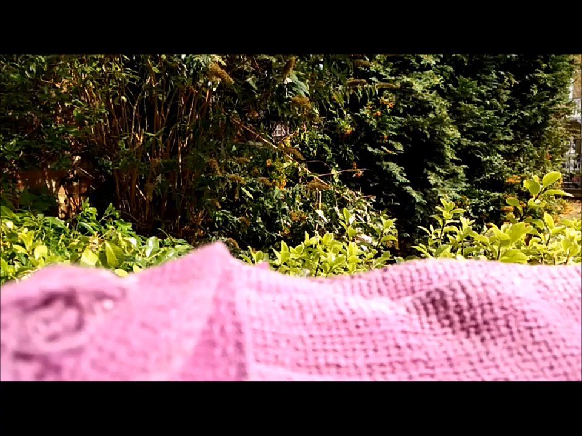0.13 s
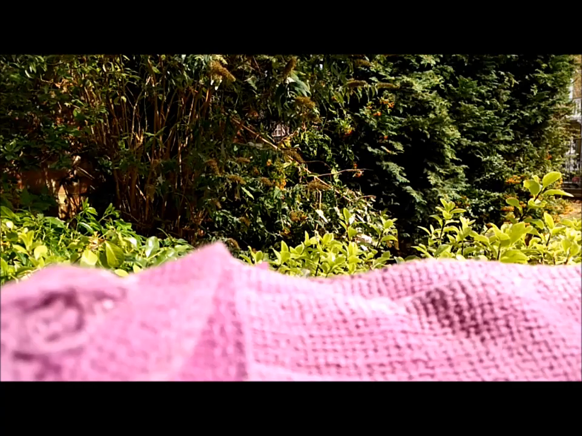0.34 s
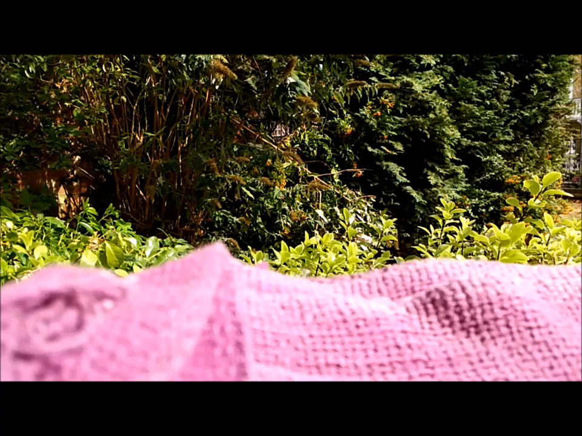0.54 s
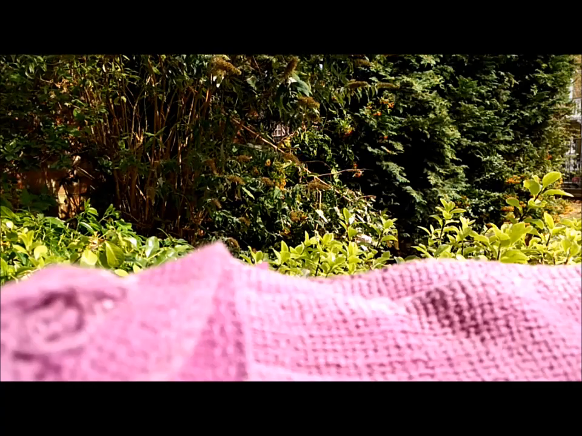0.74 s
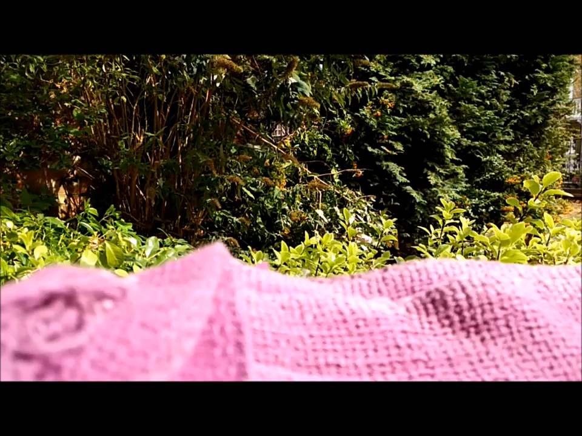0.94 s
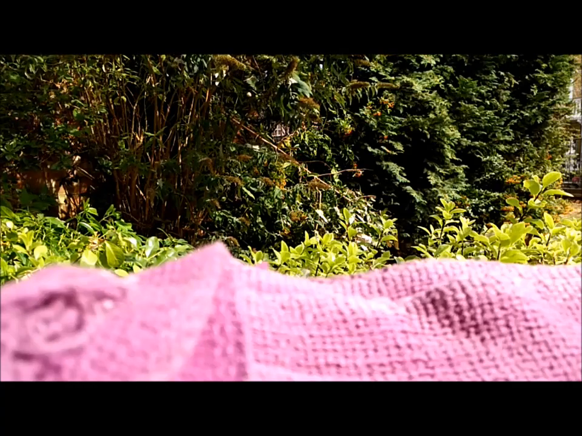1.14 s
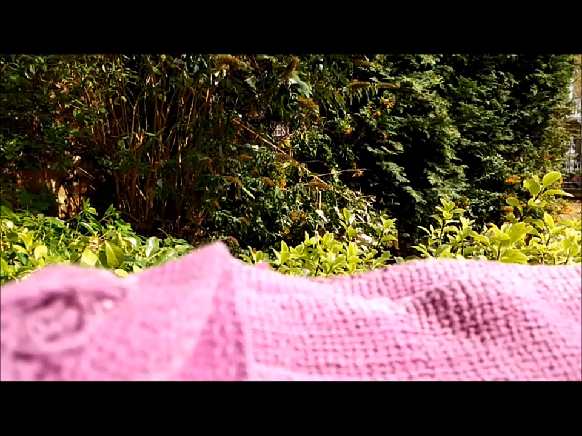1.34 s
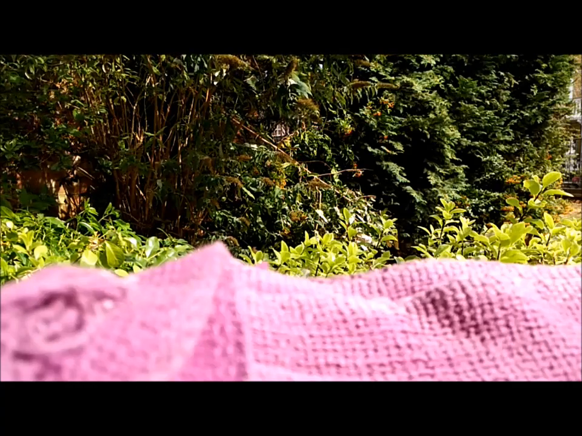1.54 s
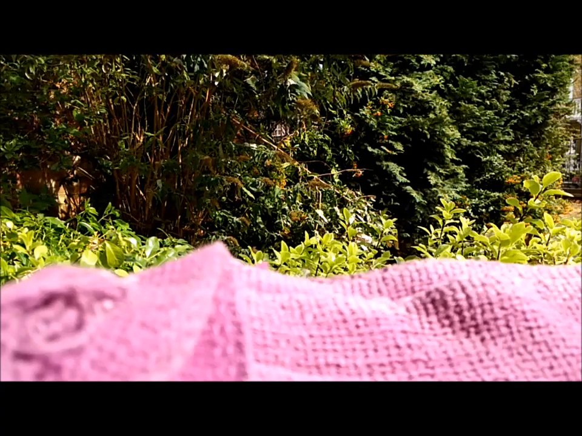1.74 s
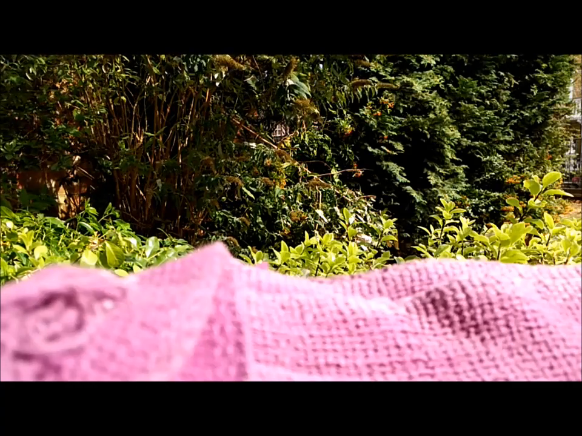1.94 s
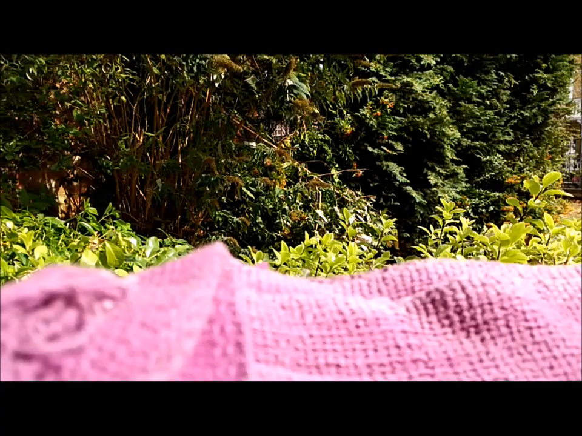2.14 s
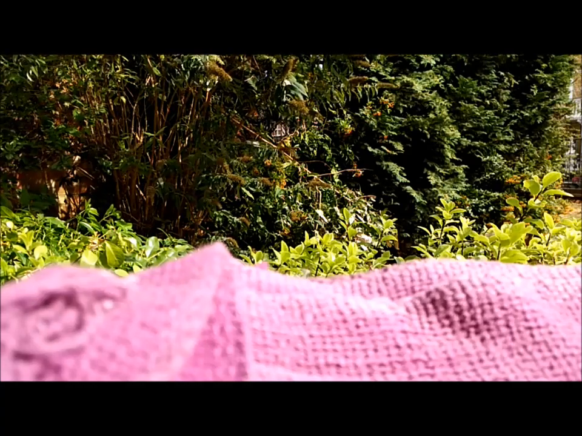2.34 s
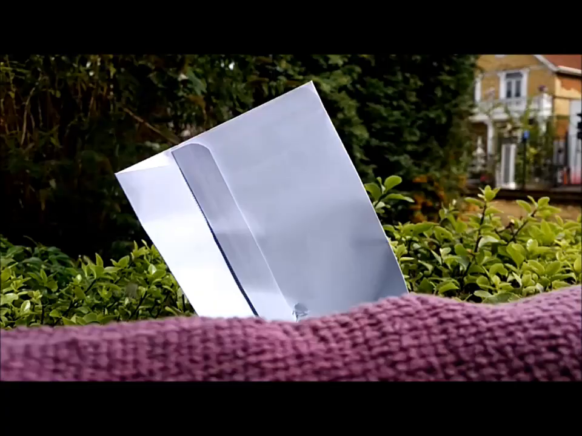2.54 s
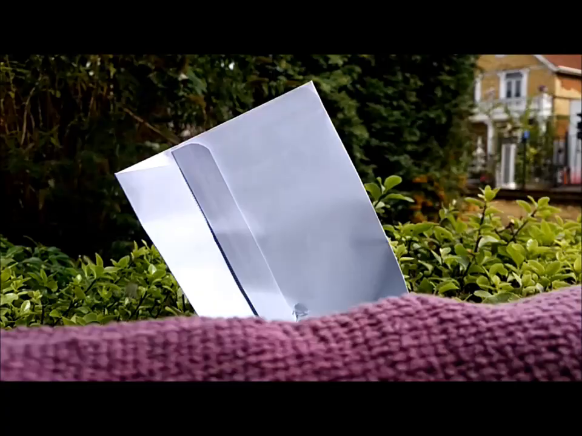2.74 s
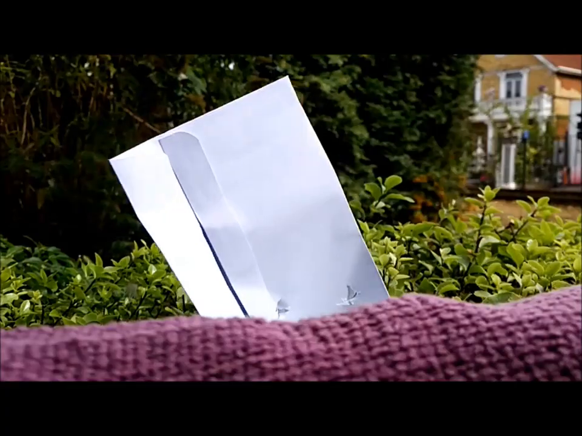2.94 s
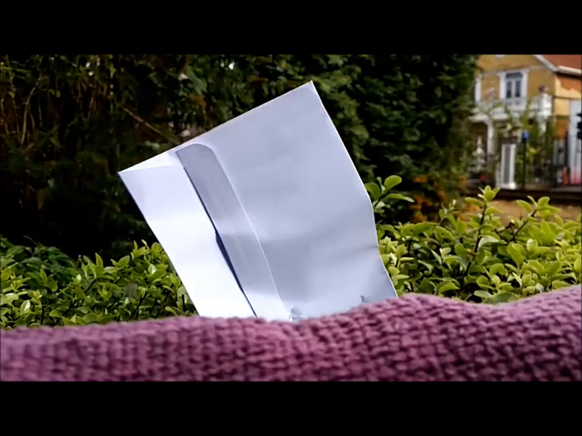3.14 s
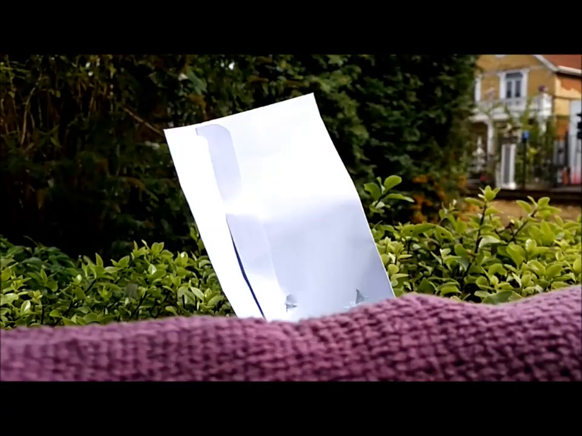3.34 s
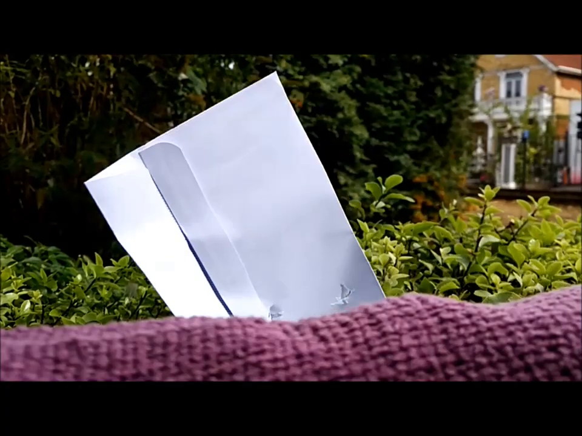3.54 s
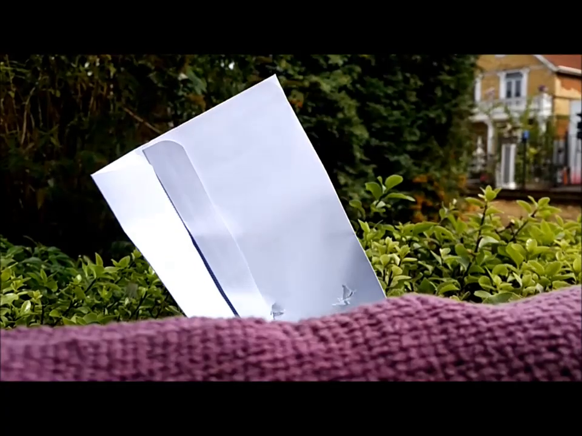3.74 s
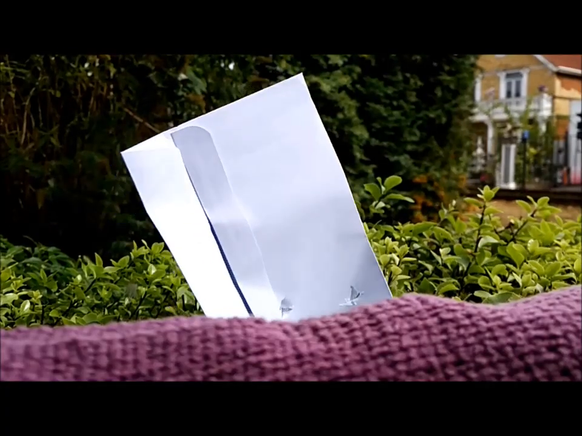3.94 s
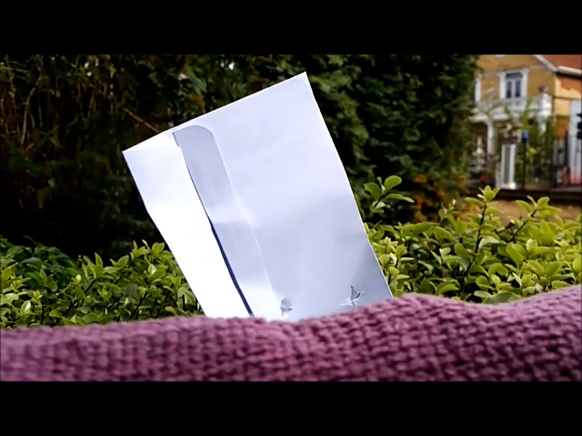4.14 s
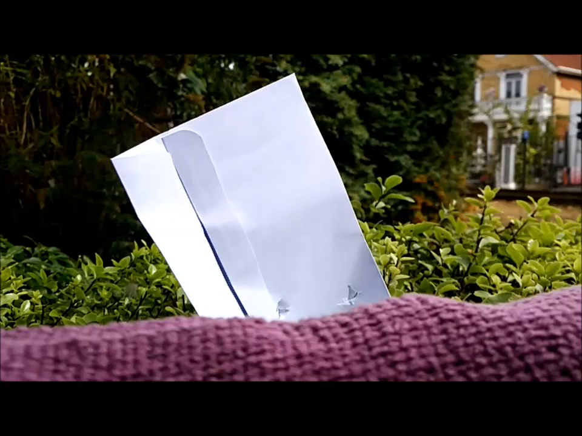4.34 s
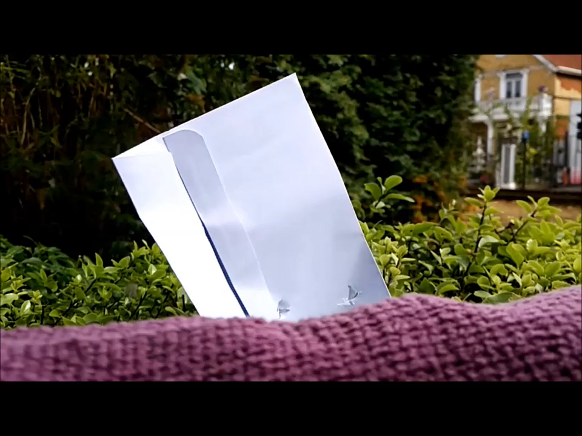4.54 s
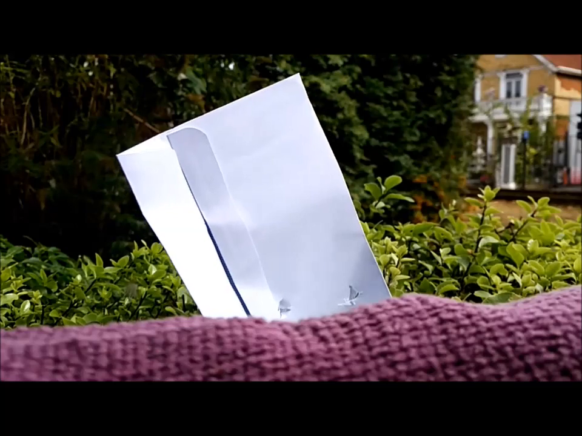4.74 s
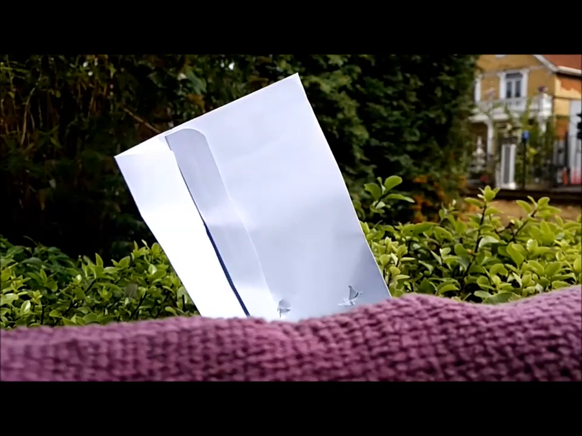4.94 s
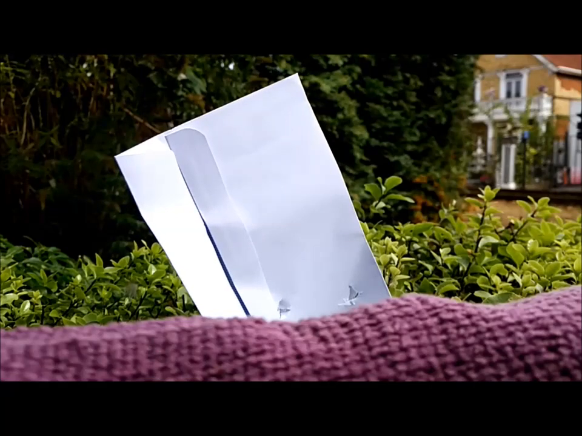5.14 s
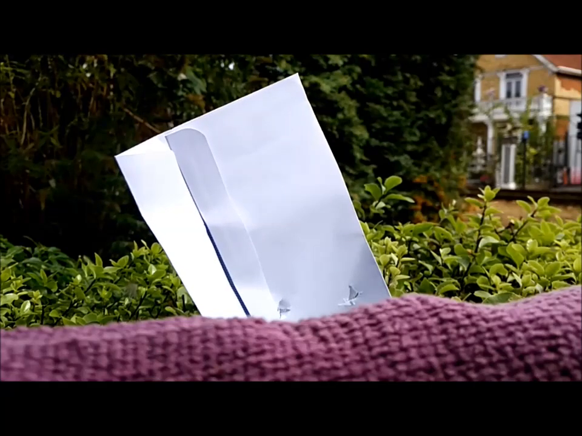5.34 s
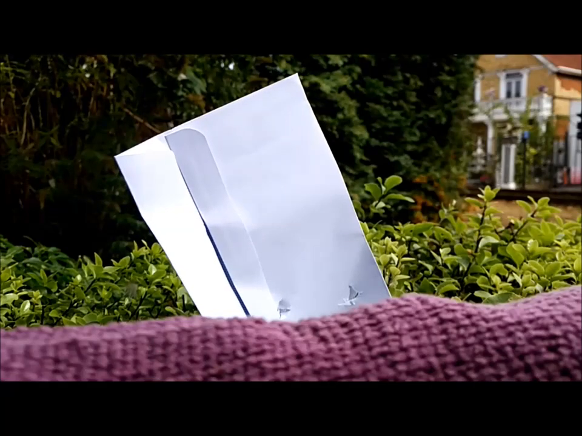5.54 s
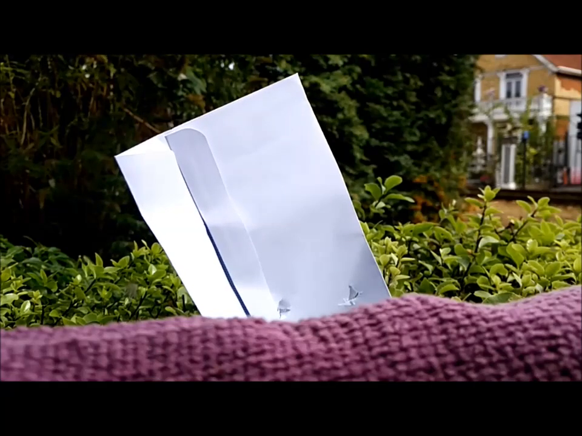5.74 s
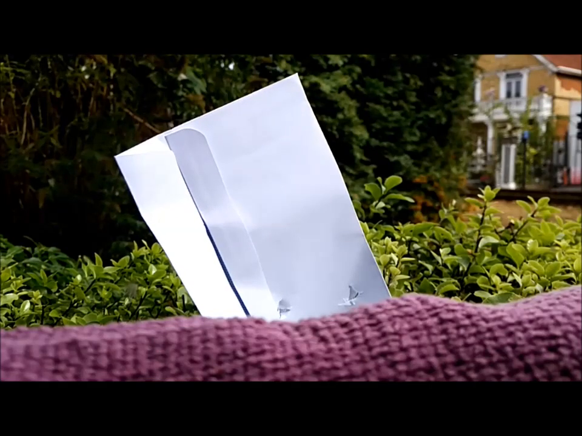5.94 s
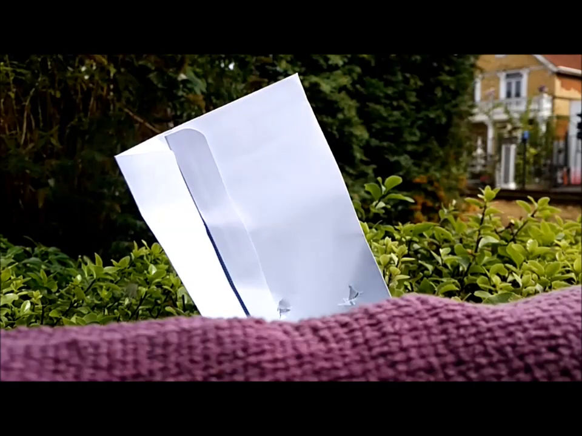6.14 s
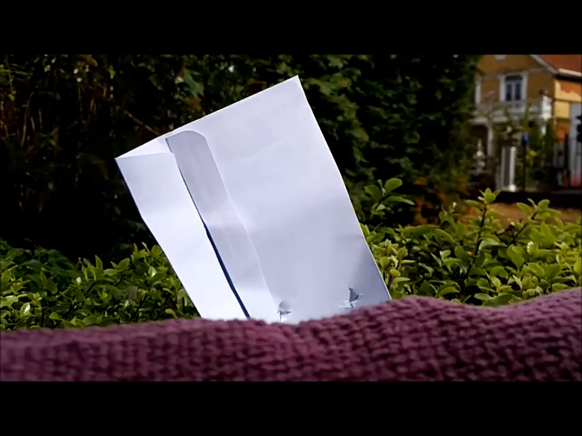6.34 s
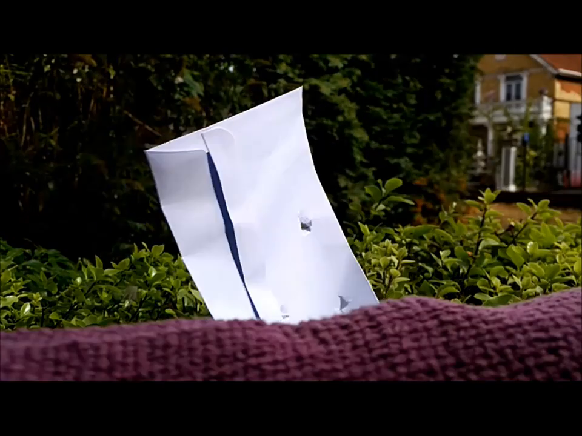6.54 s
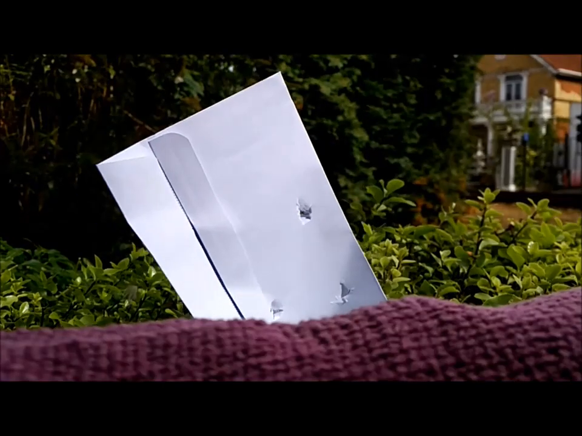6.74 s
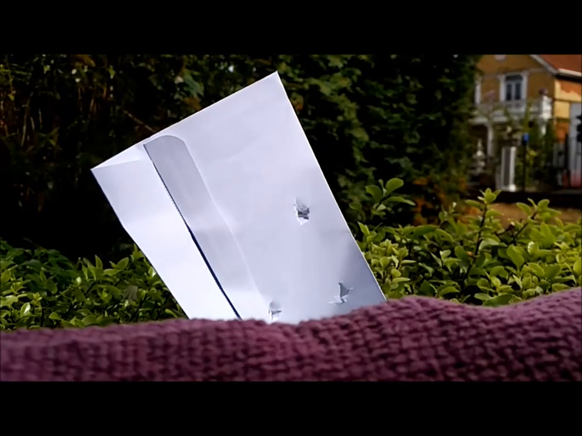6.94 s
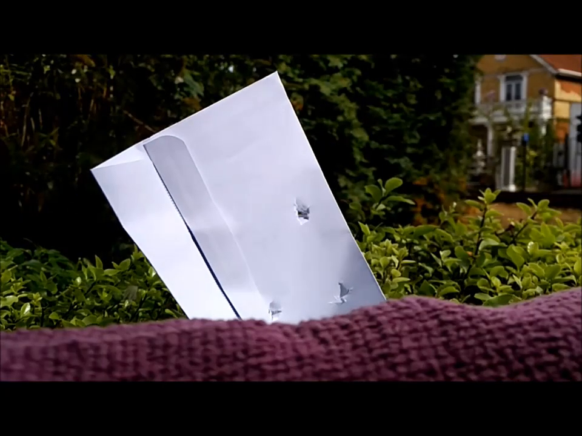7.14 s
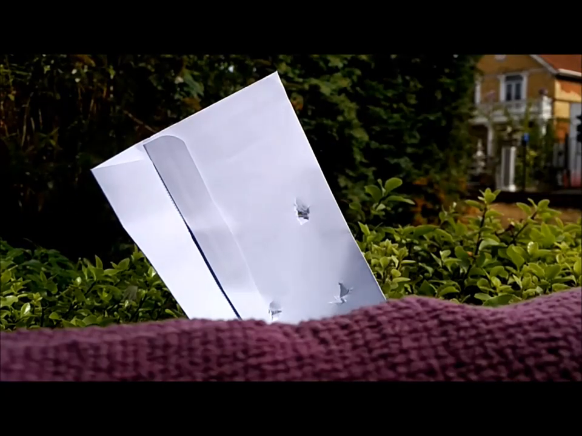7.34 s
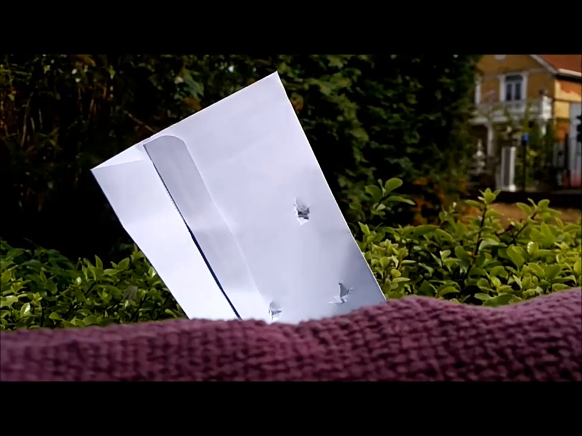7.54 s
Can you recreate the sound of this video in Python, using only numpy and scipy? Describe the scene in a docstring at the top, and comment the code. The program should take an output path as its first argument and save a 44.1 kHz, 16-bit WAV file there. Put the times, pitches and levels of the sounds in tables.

```python
"""Slingshot in a garden

Three shots at a paper target over a breeze and a far engine. Each is a hollow thump of pushed air,
cracks from pouch and paper, then a bright tail scattered by hedges and a faint echo from a house;
the last two also puff on the microphone. The first shot plays at quarter speed, the second at full
speed and again at quarter speed, the third at full speed."""
import sys
import numpy as np
from scipy import signal
from scipy.fft import irfft, next_fast_len
from scipy.io import wavfile
from scipy.ndimage import uniform_filter1d

SR = 44100
rng = np.random.default_rng(int(sys.argv[2]) if len(sys.argv) > 2 else 0)


def generate_wav(sig):
    """Save sig (samples, or channels by samples) to the path in sys.argv[1] as 16-bit PCM at SR."""
    pcm = np.round(np.clip(np.atleast_2d(sig).T, -1, 1) * 32767).astype(np.int16)
    wavfile.write(sys.argv[1], SR, pcm)


N = 334719


def from_db(db):
    """Decibels to gain."""
    return 10 ** (np.asarray(db) / 20)


def rms_one(x):
    """Scale to unit rms."""
    return x / np.sqrt(np.mean(x ** 2) + 1e-20)


def at_hz(points, hz):
    """Read a curve over log frequency."""
    points = np.array(points)
    return np.interp(np.log(hz + 1), np.log(points[:, 0]), points[:, 1])


def pan(left_db):
    """Stereo gains that put left this far above right."""
    return from_db([[left_db / 2], [-left_db / 2]])


def add(out, s, sound):
    """Mix a sound in at s seconds."""
    at = round(s * SR)
    out[:, at:at + sound.shape[1]] += sound[:, :N - at]


def noise(colour, likeness, size):
    """Unit-rms stereo noise of a given spectrum and left-right correlation."""
    hz = np.arange(size // 2 + 1) * SR / size
    mid, side = np.exp(2j * np.pi * rng.random((2, len(hz))))
    alike = np.clip(at_hz(likeness, hz), -1, 1)
    stereo = np.sqrt(1 + alike) * mid + np.sqrt(1 - alike) * side * [[1], [-1]]
    return rms_one(irfft(stereo * from_db(at_hz(colour, hz)), size))


def band(x, low_hz, high_hz):
    """Gentle band-pass."""
    return signal.sosfilt(signal.butter(2, [low_hz, high_hz], "band", fs=SR, output="sos"), x)


def around(hz, octaves):
    """Edges of a band centred on a pitch."""
    return hz / 2 ** (octaves / 2), hz * 2 ** (octaves / 2)


def cut_top(x, cutoff_hz=16300):
    """Steep low-pass on the highest treble."""
    return signal.sosfilt(signal.ellip(12, .1, 90, cutoff_hz, fs=SR, output="sos"), x)


def background_gains(crossfade_s=.02):
    """Breeze, calm air and engine hold steady in stretches; the engine also swells and sinks back."""
    # background stretches: (start [s], breeze [dB], calm air [dB], engine [dB])
    weather = np.array([(0, -44, -54.5, -49.5), (2.555, -72.5, -50, -51.5), (6.3, -44.5, -59, -55.5)])
    # bell-shaped engine swells: (peak time [s], rise [dB], sigma [s])
    swells = [(6.92, 13, 0.065), (7.377, 17, .2)]
    t = np.arange(N) / SR
    stretch = np.searchsorted(weather[1:, 0], t)
    breeze_db, calm_db, engine_db = uniform_filter1d(weather[stretch, 1:].T, round(crossfade_s * SR))
    swell_db = sum(rise_db * np.exp(-.5 * ((t - s) / sigma) ** 2) for s, rise_db, sigma in swells)
    return from_db([breeze_db, calm_db, engine_db + swell_db])


def far_engine(hz=74, width_hz=20, waver_depth=.25):
    """A far engine idles: a low, slightly wavering drone."""
    waver = rms_one(band(rng.standard_normal(N), hz - width_hz / 2, hz + width_hz / 2))
    return rms_one(np.sin(2 * np.pi * hz * np.arange(N) / SR) + waver_depth * waver)


def outdoors():
    """The ambience bed: breeze over calm air, with the far engine."""
    # spectra of breeze and calm air: (frequency [Hz], level [dB])
    breeze_colour = [(20, -17.5), (45, -3), (75, -1), (140, -9), (200, -16), (310, -12.5), (450, -17),
                     (950, -18), (1500, -25), (2600, -34.5), (4500, -39), (7400, -38.5), (10500, -46.5),
                     (16000, -54.5)]
    calm_colour = [(30, -21), (75, -4.5), (130, -16.5), (220, -20), (310, -19.5), (450, -25), (800, -27),
                   (1150, -24), (2000, -35.5), (4000, -45.5), (7500, -42.5), (11000, -48), (16000, -52)]
    # stereo image of the air: (frequency [Hz], left-right correlation)
    likeness = [(60, 1), (240, 0.46), (950, -0.35), (3770, 0.07), (15000, -0.36)]
    breeze_gain, calm_gain, engine_gain = background_gains()
    size = next_fast_len(N)
    breeze = breeze_gain * noise(breeze_colour, likeness, size)[:, :N]
    calm = calm_gain * noise(calm_colour, likeness, size)[:, :N]
    return (breeze + calm + engine_gain * far_engine()) * pan(left_db=.5)


def peep(s=1.19, length_s=.14, hz=6990, width_hz=490, level_db=-66):
    """A faint high peep, like a small bird in the hedge."""
    out, size = np.zeros((2, N)), round(length_s * SR)
    tone = band(rng.standard_normal((2, size)), hz - width_hz / 2, hz + width_hz / 2)
    add(out, s, from_db(level_db) * rms_one(tone) * signal.windows.tukey(size, .5))
    return out


def garden_reverb(shots, build_s=.0013, trees_t60_s=.82, echo_s=.162, blur_s=.012):
    """Near leaves scatter a short dense tail, far trees a faint duller one; a house echoes softly."""
    # spectrum of the scatter: (frequency [Hz], level [dB])
    colour = [(100, 0), (400, -8.5), (1200, -5.5), (2800, -3), (5000, -4.5), (8000, 0), (12000, -2),
              (16000, -9.5)]
    # its stereo image: (frequency [Hz], left-right correlation)
    likeness = [(200, 0.98), (1000, .35), (4000, 0.8), (9000, 0.099)]
    # reverb sends per shot: (start [s], end [s], leaves [dB], leaves t60 [s], trees [dB], house [dB])
    sends = [(0, 2, -44.5, 0.12, -70.5, -85), (2, 6, -39.5, 0.18, -70, -73), (6, 8, -42, 0.25, -61.5, -91)]
    out, t = np.zeros((2, N)), np.arange(SR * 3 // 4) / SR
    for start, end, leaves_db, leaves_t60, trees_db, house_db in sends:
        leaves = from_db(leaves_db - 60 * t / leaves_t60)
        trees = from_db(trees_db - 60 * t / trees_t60_s)
        house = from_db(house_db) * np.exp(-.5 * ((t - echo_s) / blur_s) ** 2)
        near = noise(colour, likeness, len(t)) * (1 - np.exp(-t / build_s))
        far = band(noise(colour, likeness, len(t)), 200, 11000)  # what survives the distance
        response = near * leaves + far * (trees + house)
        shot = shots[:, round(start * SR):round(end * SR)]
        add(out, start, signal.fftconvolve(shot, response, axes=1))
    return out


def spray(level_db, t60, low_hz, high_hz, hold=0, rise_s=.00019, grain_db=3.2):
    """A spray of tiny uneven snaps that flares up, holds and dies in milliseconds."""
    # spectrum of a crack: (frequency [Hz], level [dB])
    colour = [(150, 0), (600, 7.5), (1500, 3), (2800, -5), (4800, -5.5), (7500, -1), (10000, -5),
              (13000, -7.5), (16000, -3.5)]
    # its stereo image: (frequency [Hz], left-right correlation)
    likeness = [(200, 1), (1000, 0.92), (3000, 0.32), (8000, 0.023)]
    t = np.arange(SR // 10) / SR
    fade = from_db(-60 * np.maximum(t - hold, 0) / t60)
    flare = 1 - np.exp(-t / rise_s)
    grain = from_db(grain_db * rms_one(uniform_filter1d(rng.standard_normal(len(t)), size=10)))
    burst = band(noise(colour, likeness, len(t)) * flare * fade * grain, low_hz, high_hz)
    return from_db(level_db) * rms_one(cut_top(burst)) * np.sqrt(np.mean(fade ** 2))


def far_knock(s=2.4):
    """One faint, dull knock."""
    out = np.zeros((2, N))
    add(out, s, spray(level_db=-42, t60=.0043, low_hz=599.9, high_hz=2000))
    return out


def ticks(t60=.017, octaves=.8):
    """Bands, pouch and twigs tick lightly around the shots."""
    # narrow-band ticks: (time [s], level [dB], pitch [Hz])
    hits = [(1.0508, -42.5, 3150), (1.0695, -22.5, 6400), (2.61, -49, 4055), (2.8743, -39.5, 4230),
            (2.8825, -43.5, 4613), (2.888, -46, 3790), (3.1895, -50, 7880), (3.1945, -45, 7930),
            (3.292, -58, 4540), (6.659, -41, 5900), (6.666, -42, 4250), (6.6706, -33.5, 5230)]
    out = np.zeros((2, N))
    for s, level_db, hz in hits:
        add(out, s, spray(level_db, t60, *around(hz, octaves)))
    return out


def air_swings(pushes, sag):
    """Pushed air swells and swings for a few cycles, its pitch sagging as the push slackens."""
    out, t = np.zeros((2, N)), np.arange(SR // 10) / SR
    for s, hz, peak_db, swell_s, left_db in pushes:
        age = t / swell_s
        pitch = hz * (1 + sag * (np.exp(-age / 2) - .5))
        phase = 2 * np.pi * np.cumsum(pitch) / SR
        envelope = from_db(peak_db) * age * np.exp(1 - age)
        add(out, s, envelope * np.sin(phase) * pan(left_db))
    return out


def puffs():
    """Slow puffs of air reach the microphone, sucking before they push."""
    # bass puffs: (time [s], pitch [Hz], peak [dB], swell [s], left over right [dB])
    pushes = [(2.910, 66, -21.5, .007, 12), (2.950, 56.44, -25.5, 0.0079, 28.5),
              (6.685, 54.5, -15.5, 0.0098, 10)]
    return -air_swings(pushes, sag=.23)


def thumps():
    """Pouch and sheet push the air into hollow thumps."""
    # thumps: (time [s], pitch [Hz], peak [dB], swell [s], left over right [dB])
    pushes = [ (1.0670, 881, -7, 0.0017, 3.5), (1.0718, 1025, -19, 0.002, -5),
              (1.0758, 927, -16, 0.0015, 4), (2.8972, 674, -1.5, 0.00072, 1),
              (2.9012, 1393, -7.5, 0.00063, 3.5), (6.6742, 590, -3, 0.001, 1.5),
              (6.6815, 135, -10.5, 0.0029, 6)]
    return air_swings(pushes, sag=.12)


def shoves(hz=280, peak_db=-10, swell_s=.0013, left_db=2, flutter_delay_s=.01, flutter_t60=.065):
    """The low body of every shot: one shove of air, then the dull flutter of the sheet."""
    # shots: (time [s], flutter level [dB], flutter pitch [Hz])
    shots = [(1.0674, -17, 523), (2.8978, -18.5, 265), (6.675, -16.5, 290)]
    out = air_swings([(s, hz, peak_db, swell_s, left_db) for s, _, _ in shots], sag=.071)
    for s, flutter_db, flutter_hz in shots:
        add(out, s + flutter_delay_s, spray(flutter_db, flutter_t60, *around(flutter_hz, octaves=1.2)))
    return out


def crunches(t60=.059):
    """Pouch and paper crackle densely for a moment, then die away."""
    # crunches: (time [s], level [dB], hold [s], low edge [Hz], high edge [Hz])
    hits = [(1.0567, -29, 0.0054, 810, 5800), (2.8976, -10.5, .006, 600, 9473),
            (6.6737, -11.5, 0.0082, 1160, 8700)]
    out = np.zeros((2, N))
    for s, level_db, hold, low_hz, high_hz in hits:
        add(out, s, spray(level_db, t60, low_hz, high_hz, hold))
    return out


def snaps(rebounds=3, first_gap_s=.0058, slowing=1.35, loss_db=11):
    """A whip-like crack, then the slack bands slap back, each time later and weaker."""
    # cracks: (time [s], level [dB], t60 [s], low edge [Hz], high edge [Hz], first rebound [dB])
    hits = [(1.0757, -7, 0.0093, 4740, 15500, -32.5), (1.0781, -12.5, 0.01, 8000, 16000, -35.5),
            (2.8961, -6.5, 0.0053, 1492, 10800, -25), (2.9129, -1, 0.0068, 2998, 11970, -13.5),
            (6.6868, -5, 0.0073, 305, 9900, -17.5)]
    out = np.zeros((2, N))
    for s, level_db, t60, low_hz, high_hz, rebound_db in hits:
        add(out, s, spray(level_db, t60, low_hz, high_hz))
        for k in range(rebounds):
            slap = spray(rebound_db - k * loss_db, t60=.031, low_hz=4300, high_hz=11700)
            add(out, s + first_gap_s * (k + 1) ** slowing, slap)
    return out


def scene():
    """The garden at natural speed; all cue times run on this clock."""
    shots = ticks() + crunches() + snaps() + shoves() + thumps()
    return shots + garden_reverb(shots) + far_knock() + puffs() + peep() + outdoors()


def record(dry):
    """The microphone sheds rumble and overloads on peaks; slow motion drops the sound two octaves."""
    # playback order: (start [s], end [s], start in the scene [s], slowdown [x])
    passages = [(0, 2.312, .8, 4), (2.312, 3.152, 2.312, 1), (3.152, 6.325, 2.8164, 4),
                (6.352, 7.6, 6.352, 1)]
    rumble_cut = signal.butter(2, 28, "high", fs=SR, output="sos")
    overloaded = cut_top(np.clip(signal.sosfilt(rumble_cut, dry), -.95, .95))
    out = np.zeros((2, N))
    for start, end, source, slower in passages:
        piece = overloaded[:, round(source * SR):round((source + (end - start) / slower) * SR)]
        add(out, start, signal.resample_poly(piece, slower, 1, axis=1, window=("kaiser", 9)))
    return cut_top(np.clip(out, -1, 1))


dry = scene()
out = record(dry)
generate_wav(out)
```